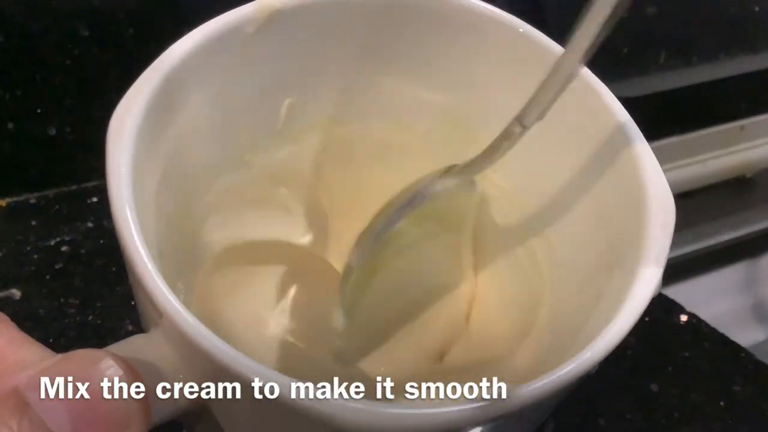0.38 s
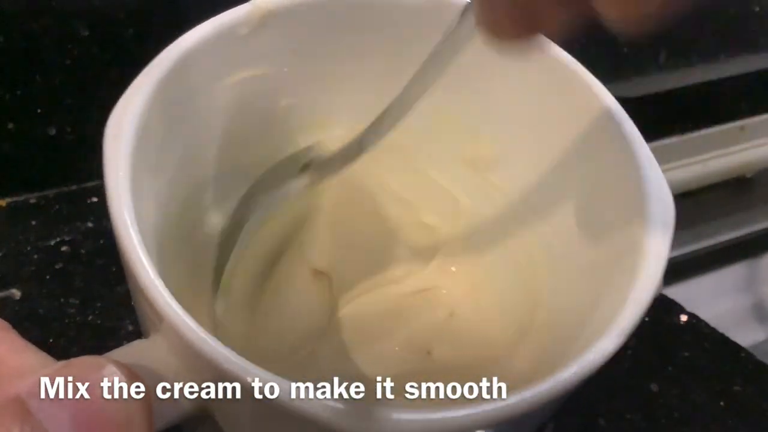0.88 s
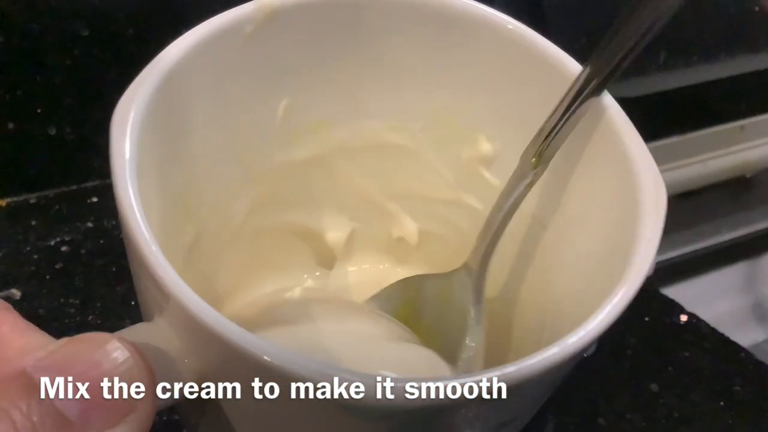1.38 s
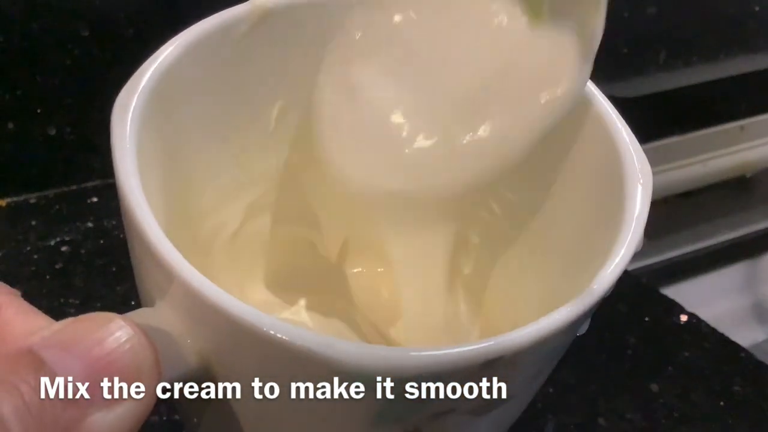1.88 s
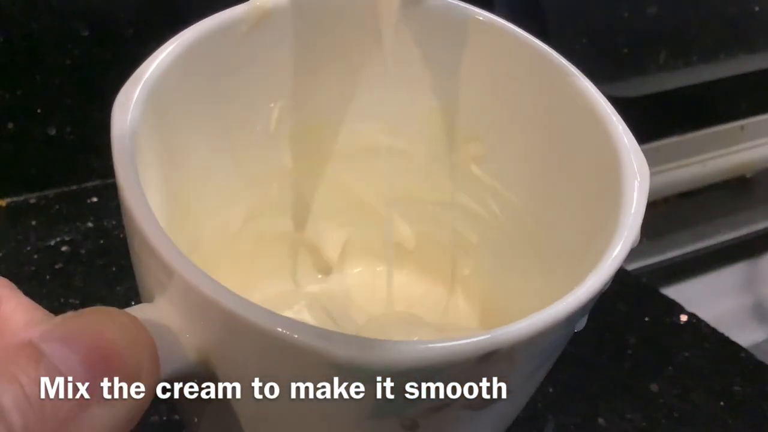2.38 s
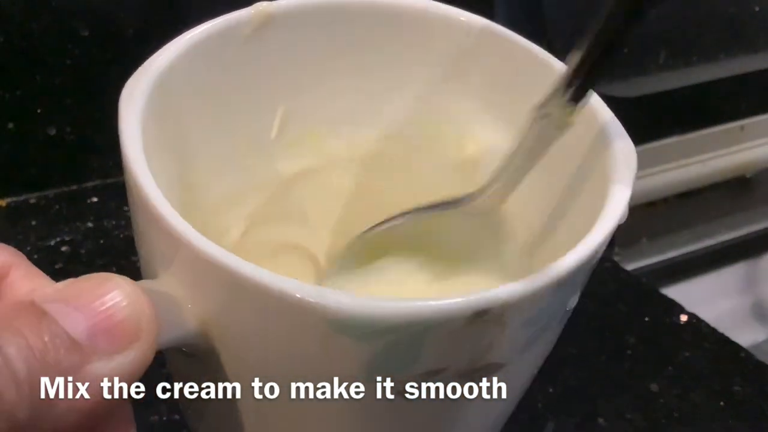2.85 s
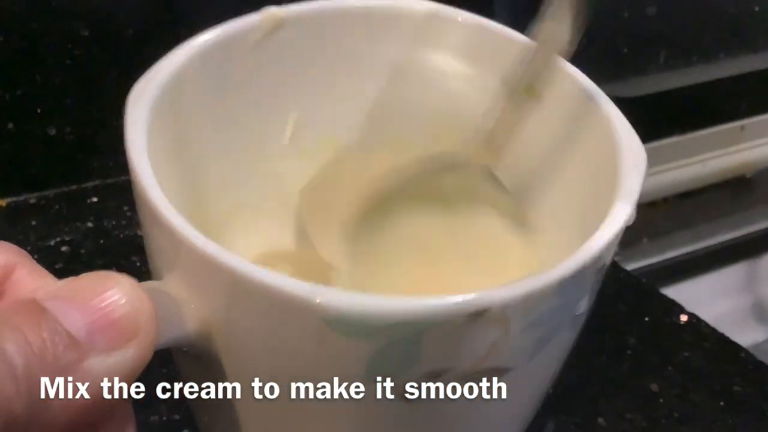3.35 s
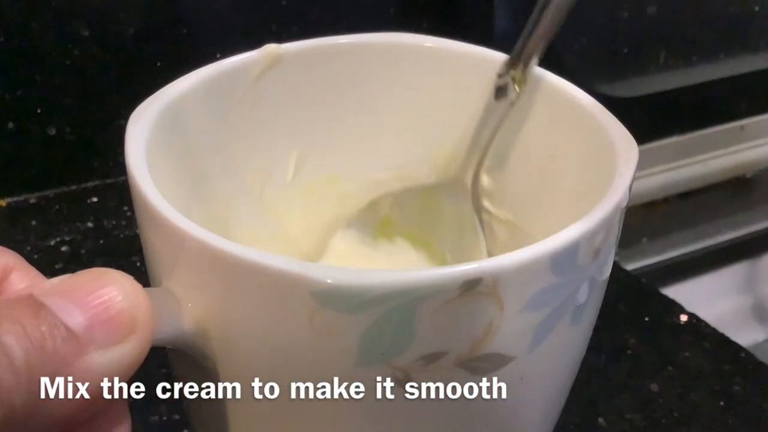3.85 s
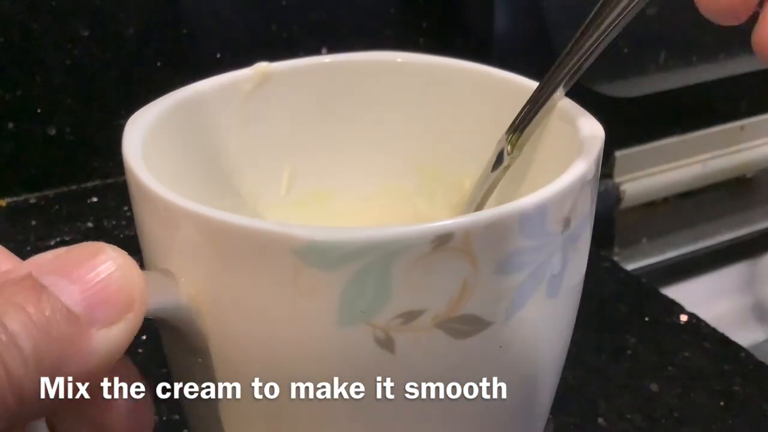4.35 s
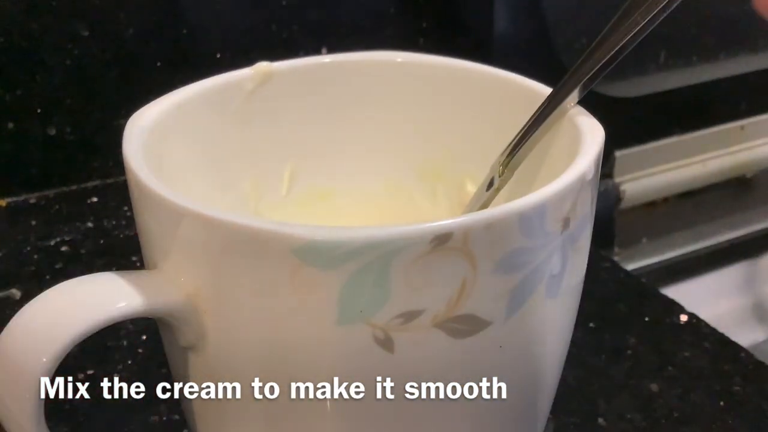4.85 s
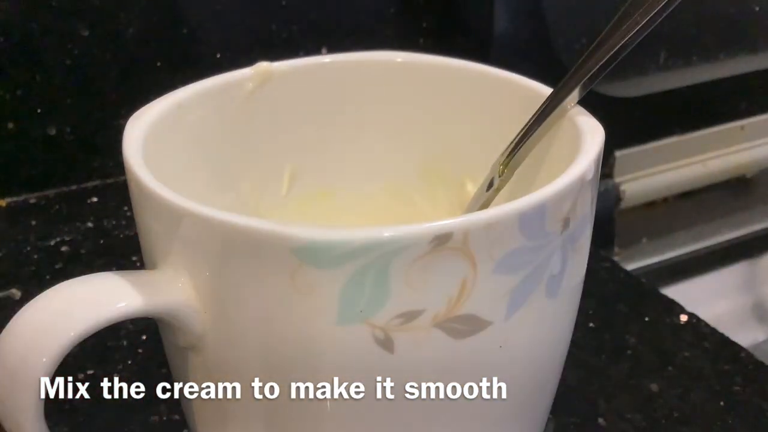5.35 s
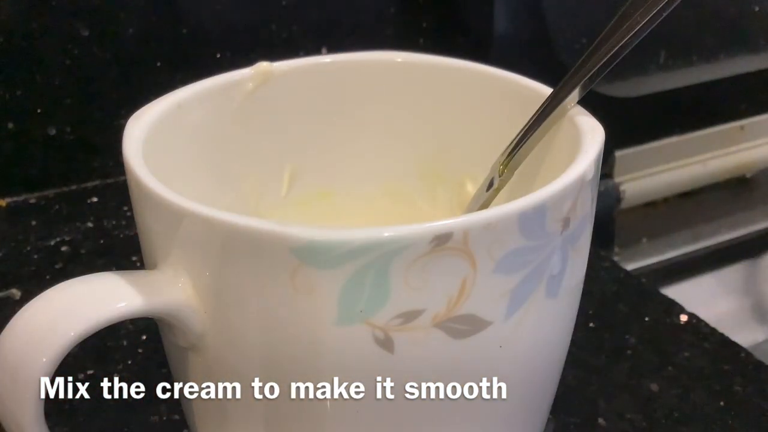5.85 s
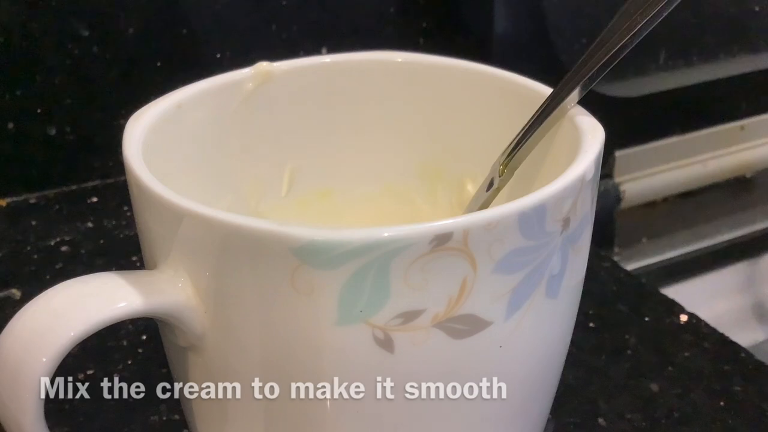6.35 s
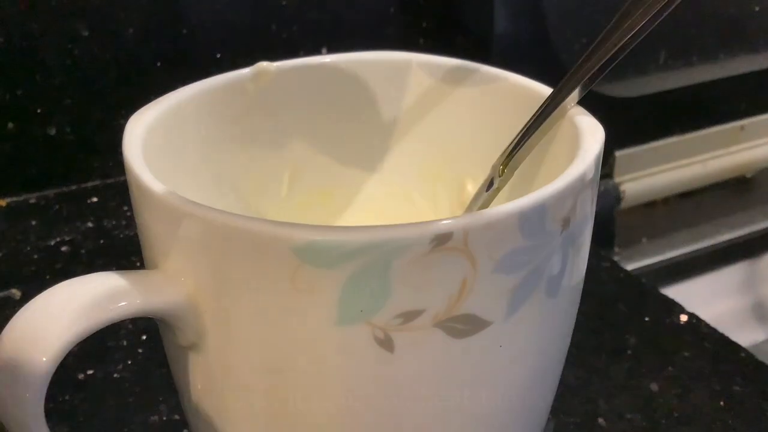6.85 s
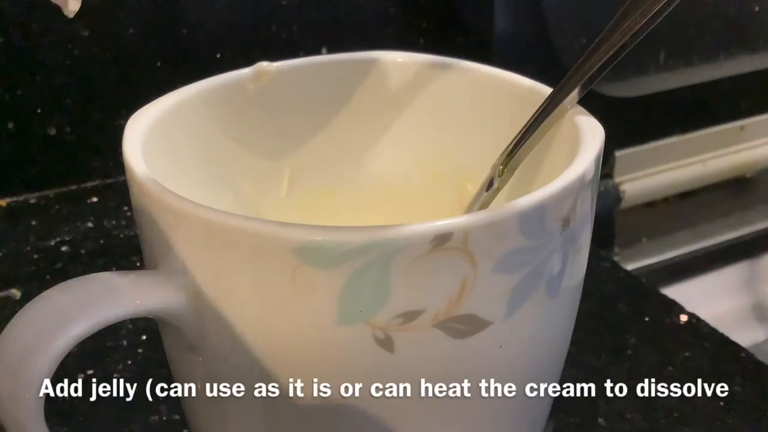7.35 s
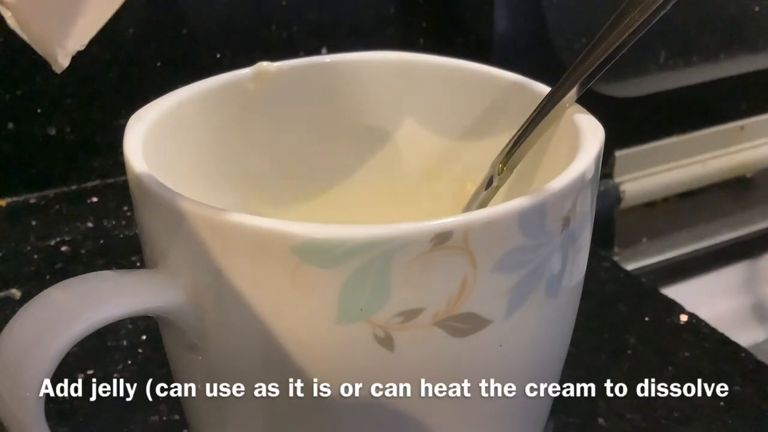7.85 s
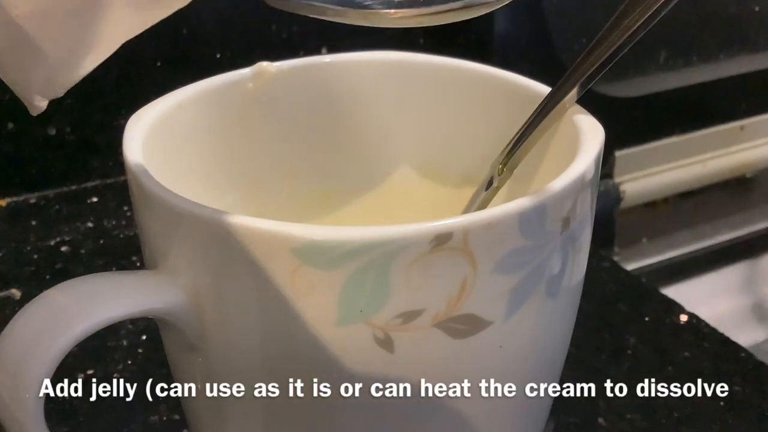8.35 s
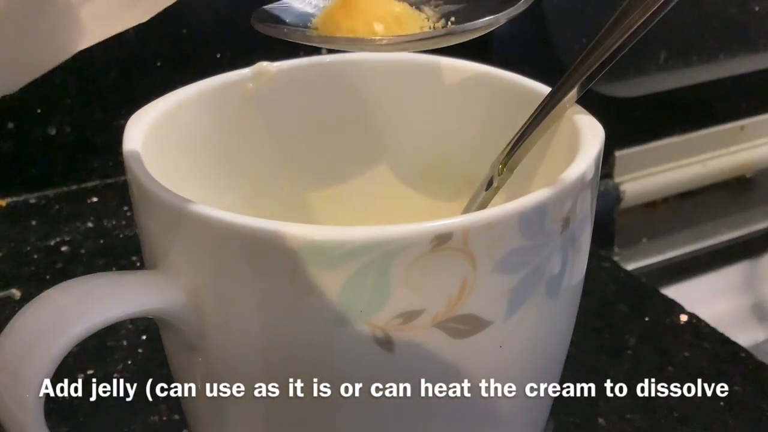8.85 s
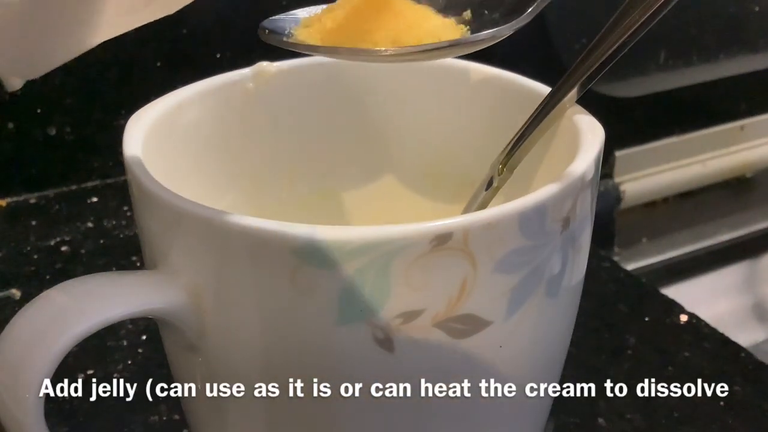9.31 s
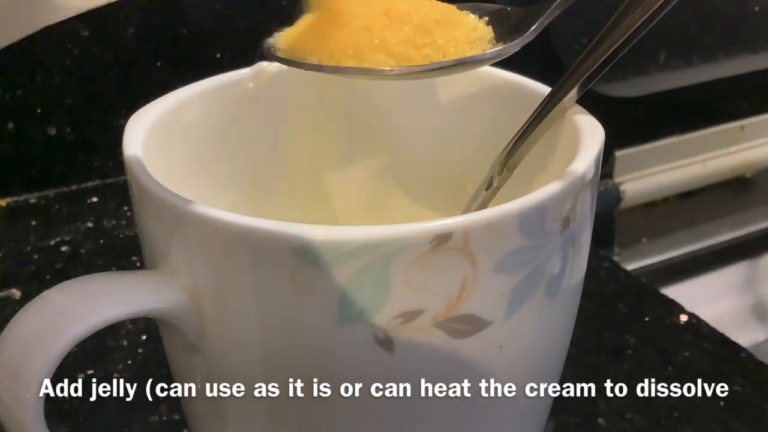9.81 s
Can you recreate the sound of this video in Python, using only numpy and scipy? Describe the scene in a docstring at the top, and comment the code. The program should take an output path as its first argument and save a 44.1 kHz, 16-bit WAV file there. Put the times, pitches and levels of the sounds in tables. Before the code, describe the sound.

Damped spoon clinks and short wet scrapes in a thick mug, clear bird whistles through a window, then faint packet rustle and distant traffic.

```python
"""Spoon in a mug, birds outside

A steel spoon knocks and scrapes in a thick ceramic mug half full of cream, with a few small ticks and late
taps nearby: damped modes and noise, kitchen echo. Through the window one bird whistles, another chirps harshly,
and high calls sound: gliding sines, yard echo. Later a paper packet rustles and powder hisses (shaped noise,
ticks), and distant traffic swells with a drone. Noise makes the room tone and a wavering hum; a faint soft
throb recurs about four times a second.
"""
import sys
import numpy as np
from scipy import signal
from scipy.fft import rfft, irfft
from scipy.io import wavfile
from scipy.ndimage import uniform_filter1d

SR = 44100
rng = np.random.default_rng(int(sys.argv[2]) if len(sys.argv) > 2 else 0)


def natural_amplitude(level_db):
    """Convert a level in decibels to a linear amplitude factor, elementwise."""
    exponent = np.asarray(level_db, float) / 20
    return 10 ** exponent


def inscribe(sig):
    """Save sig as 16-bit PCM at rate SR to the path in sys.argv[1].

    A 1-D sig is mono; a 2-D sig holds one channel per row.
    Samples are clipped to [-1, 1] before scaling.
    """
    pcm = np.round(np.clip(np.atleast_2d(sig).T, -1, 1) * 32767)
    wavfile.write(sys.argv[1], SR, pcm.astype(np.int16))


N = 438794
T = np.arange(N) / SR

# room tone spectrum: (frequency [Hz], relative density [dB per Hz])
ROOM_COLOUR = [(20, -15.5), (45, -7), (100, -7), (142, -7.5), (293, -11), (580, -14.5), (1000, -18),
               (1450, -26.5), (2900, -31.5), (5500, -38), (16000, -51)]
ROOM_DB = -65

# knocks on the mug, with a few small ticks and late taps nearby, all through the mug's modes:
# (time [s], strength [dB], height [0 base - 1 rim], bareness of steel [0 creamy - 1 clean])
STRIKES = [(0.049, -25, 0.78, 0.77), (0.095, -20, 0.52, 0.4), (0.31, -21.5, 0.92, 0.65),
           (0.343, -19.5, 0.5, 0.36), (0.703, -18.5, 0.47, 0.42), (0.978, -36, 0.41, 0.018),
           (1.048, -49, 0.072, 0.6), (1.08, -38.5, 0.41, 0.25), (1.147, -39, 0.77, 0.7),
           (1.18, -48, 0.08, 0.74), (1.221, -39, 0.5, 0.55), (1.267, -35.5, 0.57, 0.41),
           (1.353, -39, 0.52, 0.44), (1.399, -36.5, 0.47, 0.26), (1.441, -24, 0.63, 0.75),
           (1.789, -45, 0, 0.42), (2.381, -68, 0, 1), (2.733, -21.5, 0.46, 0.49), (2.803, -28, 0.91, 0.62),
           (2.986, -50, 0, 0.99), (3.004, -28.5, 0.6, 0.36), (3.019, -31.5, 0.49, 0.11),
           (3.077, -33, 0.67, 0.57), (3.103, -52, 0.93, 0.94), (3.175, -17, 0.71, 0.76),
           (3.227, -24.5, 0.36, 0.23), (3.287, -38, 0.65, 0.19), (3.329, -33.5, 0.54, 0.61),
           (3.398, -38, 0.055, 0.72), (3.494, -37.5, 0.41, 1), (3.533, -25, 0.61, 0.34),
           (3.552, -39, 0.79, 0.57), (3.743, -26, 0.55, 0.52), (3.913, -36, 0.6, 0.52),
           (4.063, -36.5, 0.11, 0.022), (4.085, -62, 0, 1), (4.17, -64, 0, 0.85), (4.24, -42, 0.5, 0.64),
           (4.371, -62, 0, 0.76), (4.457, -55.5, 0, 0.76), (6.897, -52, 0.53, 0.48),
           (6.999, -50, 0.41, 0.43), (7.241, -41.5, 0.36, 0.065), (7.733, -42, 0.28, 0.064),
           (8.608, -49, 0.54, 0.66)]
# mug and spoon modes, four families: (frequency [Hz], relative level [dB], t60 [s])
BASE_MODES = [(271, -24, 0.076), (478, -25, 0.011), (626, -6.5, 0.045), (765, -5, 0.025), (983, -3, 0.047),
              (1085, -1, 0.038)]
WALL_MODES = [(1540, -7, 0.031), (1870, -6, 0.035), (1960, -7.5, 0.063)]
UPPER_MODES = [(2220, -15.5, 0.018), (2486, -18, 0.062), (3100, -10, 0.039), (4270, -9.5, 0.015)]
SPOON_MODES = [(5600, -12, 0.022), (7740, -15.5, 0.022), (8900, -17, 0.025)]
# relative share of base, wall, upper, spoon families:
# (at height 0 and bareness 0 [dB], slope [dB per height], slope [dB per bareness])
FAMILY_SHARES = [(0, -3.5, 4.5), (-29.5, 50.5, 6), (-24, 20, 32), (-40.5, 4.5, 65.5)]
MODE_SCATTER_DB, CHATTER_S, DETUNE_RATIO = 5, 0.0012, 0.025  # largest deviation per mode
BODY_BELOW_HZ, BODY_DB_PER_HEIGHT = 800, 18  # deep modes wake only when the blow lands well up the wall
THUD_DB, THUD_T60_S = -23.5, 0.007
CRACK_DB, CRACK_T60_S = -11.5, 0.039
# hard low blows jolt the mug on the counter; growth in dB per dB of base level, up to the knee
JOLT_DB, JOLT_T60_S, JOLT_KNEE_DB, JOLT_GROWTH = -8, 0.1, -25.5, 7.5

# spoon strokes along the glaze: (start [s], length [s], level [dB], brightness of bare steel on glaze [dB])
STROKES = [(0.06, 0.098, -57, -3.5), (0.315, 0.055, -70.5, 7), (1.036, 0.098, -48.5, -23),
           (1.111, 0.098, -48.5, -11.5), (1.181, 0.18, -53.5, -10), (1.388, 0.042, -54.5, -13),
           (1.455, 0.085, -65.5, -0.5), (3.037, 0.0093, -53.5, -18), (3.072, 0.04, -54.5, -9),
           (3.177, 0.15, -72, -17), (3.327, 0.063, -44, -19.5), (3.384, 0.073, -59, -8.5),
           (3.484, 0.047, -78, 4), (3.547, 0.09, -52, -15), (3.928, 0.031, -48, -18)]
FLURRY_DB = 6.5  # unevenness of scraping
SLIDE_SHARE, CRACKLE_SHARE = 0.5, 1.1  # smooth sliding and wet crackle beside the ticks
KITCHEN_T60_S, KITCHEN_DB = 0.44, -10.5

# whistled arcs: (start [s], length [s], first [Hz], middle [Hz], last [Hz], mean level [dB rms])
WHISTLE_NOTES = [(0.105, 0.15, 1915, 1897, 2038, -48), (0.323, 0.098, 1976, 1957, 1932, -40.5),
                 (0.721, 0.067, 2650, 2797, 3000, -47), (0.782, 0.086, 3060, 3010, 2985, -44),
                 (1.241, 0.15, 2560, 2226, 2027, -55), (1.247, 0.13, 4290, 3720, 3480, -60.5),
                 (4.137, 0.115, 2730, 2636, 2200, -66), (4.441, 0.2, 2380, 2515, 2110, -66.5),
                 (4.725, 0.09, 2964, 3040, 2640, -69.5), (4.845, 0.057, 2840, 3270, 3520, -71),
                 (4.905, 0.023, 2200, 2120, 2030, -67), (4.997, 0.064, 2270, 2057, 1910, -53.5),
                 (5.274, .15, 2350, 2065, 1712, -48), (5.73, 0.031, 2050, 2153, 2093, -46.5),
                 (5.983, 0.15, 1830, 2607, 1690, -51), (6.228, 0.064, 1717, 1963, 1667, -42.5),
                 (6.416, 0.15, 2395, 2288, 2134, -50), (6.568, 0.056, 2180, 2570, 3020, -48),
                 (6.742, 0.26, 3123, 2927, 2692, -50.5), (9.104, 0.22, 1900, 2390, 2340, -71.5)]
NOTE_SWELL_DB, STEEP_HZ_PER_S = 10, 7900  # full swell at or above this glide
NOTE_EDGE_S, ARC_FLATNESS = 0.0031, 1.9
OCTAVE_DB, OCTAVE_FROM_HZ = -30, 2700
# warbled notes: (start [s], length [s], first [Hz], last [Hz], warble depth [Hz], peak level [dB])
WARBLE_NOTES = [(.52, 0.15, 2340, 1960, 301, -50), (5.615, 0.114, 1960, 2047, 134, -46)]
WARBLE_PER_S, WARBLE_ROUGHNESS = 28, 0.2
# harsh chirps: (start [s], length [s], first [Hz], peak level [dB])
CHIRP_CALLS = [(.86, 0.06, 4620, -67.5), (1.625, 0.083, 4880, -65), (2.505, 0.084, 4860, -71),
               (4.203, 0.076, 4550, -69.5), (4.94, 0.087, 4630, -67.5), (5.63, 0.11, 4070, -64.5),
               (6.385, 0.051, 4640, -66), (6.99, 0.085, 4710, -66), (7.72, .11, 4334, -68),
               (8.42, 0.054, 4570, -71), (9.19, 0.077, 4540, -64)]
CHIRP_SAG_HZ_PER_S, CHIRP_SHAKE_DEPTH_HZ = 16000, 422.5
# short high calls: (start [s], length [s], first [Hz], peak level [dB])
HIGH_CALLS = [(1.72, 0.084, 7170, -70.5), (2.055, 0.13, 7310, -76), (7.06, 0.065, 8430, -79),
              (7.19, 0.014, 6720, -69.5), (9.43, 0.026, 6820, -81)]
HIGH_SAG_HZ_PER_S, HIGH_SHAKE_DEPTH_HZ = 7800, 239
CALL_PEAK_SKEW, CALL_SOFTNESS, CALL_OCTAVE_DB = 0.66, 0.37, -29.5  # envelope and overtone
YARD_T60_S, WHISTLE_ECHO_DB, FAR_ECHO_DB = 0.63, -1, 10

THROB_FIRST_S, THROB_PERIOD_S = 0.159, 0.256
THROB_WIDTH_S, THROB_DB = 0.011, -51.5

# powder hiss: (time [s], level [dB])
HISS_LEVEL = [(5.4, -104), (5.75, -80.5), (6.4, -77), (6.68, -86.5), (6.82, -72), (7.0, -99.5),
              (8.3, -84.5), (8.42, -68.5), (9.3, -72), (9.6, -68.5), (9.95, -75.5)]
# powder hiss spectrum: (frequency [Hz], relative density [dB per Hz])
HISS_COLOUR = [(1470, -34), (2500, -14), (3260, -2.5), (6400, -6.5), (11200, -6), (16000, -10)]
HISS_FLICKER_DB = 2
PACKET_START_S, PACKET_END_S, PACKET_TICKS_PER_S = 7.0, 8.32, 45
# small dry ticks close by: (time [s], level [dB])
DRY_TICKS = [(8.183, -61), (8.255, -73), (8.61, -50), (9.539, -52)]

# distant traffic: (time [s], rumble level [dB], drone pitch [Hz], drone level [dB])
TRAFFIC_SWELL = [(6.3, -73.5, 271, -77), (7.4, -71.5, 281, -74), (8.4, -69.5, 301.4, -69.5),
                 (9.1, -65, 301, -73), (9.95, -73.5, 300, -80)]


def curve(rows, column, outside=-120.0):
    """One table column, linear in time."""
    rows = np.array(rows, float)
    return np.interp(T, rows[:, 0], rows[:, column], outside, outside)


def level(x):
    """Scale to rms 1."""
    return x / np.sqrt(np.mean(x ** 2))


def band(x, lo_hz, hi_hz):
    """Band-pass."""
    return signal.sosfilt(signal.butter(2, [lo_hz, hi_hz], "band", fs=SR, output="sos"), x)


def coloured(points):
    """Noise of rms 1 with the given spectrum."""
    hz, db = np.transpose(points)
    bin_hz = np.maximum(np.fft.rfftfreq(N, 1 / SR), 1)
    gain = natural_amplitude(np.interp(np.log(bin_hz), np.log(hz), db))
    return level(irfft(rfft(rng.standard_normal(N)) * gain, N))


def walk(rate_hz):
    """Random levels held 1 / rate_hz and slewed twice; spread near 1."""
    hold = int(SR / rate_hz)
    steps = np.repeat(rng.standard_normal(N // hold + 1), hold)
    return 1.3 * uniform_filter1d(uniform_filter1d(steps, hold), hold)[:N]


def echo(x, t60_s, rise_s):
    """Diffuse echo: unit-energy noise tail that builds up and dies away."""
    t = T[:SR]
    envelope = np.exp(-np.log(1000) * t / t60_s) * (1 - np.exp(-t / rise_s))
    tail = rng.standard_normal(SR) * envelope
    return signal.fftconvolve(x, tail / np.sqrt(np.sum(tail ** 2)))[:N]


def ring(push, hz, t60_s):
    """One damped mode driven by a force signal."""
    radius = np.exp(-np.log(1000) / (t60_s * SR))
    w = 2 * np.pi * hz / SR
    return signal.lfilter([0, np.sin(w)], [1, -2 * radius * np.cos(w), radius ** 2], push)


def burst(at, db, t60_s, lo_hz, hi_hz):
    """Short dying puffs of noise at the given samples."""
    kick = np.zeros(N)
    kick[at] = natural_amplitude(db)
    fade = signal.lfilter([1], [1, -np.exp(-np.log(1000) / (t60_s * SR))], kick)
    return fade * level(band(rng.standard_normal(N), lo_hz, hi_hz))


def room_tone():
    """Steady coloured noise."""
    return natural_amplitude(ROOM_DB + 0.36 * walk(1.81)) * coloured(ROOM_COLOUR)


def hum():
    """Narrow noise near 100 Hz, wavering in level."""
    return natural_amplitude(-68.0 + 2.6 * walk(22)) * level(band(rng.standard_normal(N), 72.7, 107.0))


def struck_modes(at, family_levels_db, height):
    """Each blow lands on another spot and chatters, so every mode gets its own share, start and tuning."""
    out, t = np.zeros(N), T[:SR // 5]
    for levels_db, modes in zip(family_levels_db, [BASE_MODES, WALL_MODES, UPPER_MODES, SPOON_MODES]):
        hz, db, t60_s = np.transpose(modes)[:, :, None]
        family = np.zeros(N)
        chances = rng.random((len(at), 3, len(modes), 1))
        for i, blow_db, up, chance in zip(at, levels_db, height, chances):
            share, late, tune = 2 * chance - 1
            since = np.maximum(t - np.abs(late) * CHATTER_S, 0)
            # spoon and cream load the wall a little differently every time
            tone = np.sin(2 * np.pi * hz * (1 + DETUNE_RATIO * tune) * since)
            waves = tone * np.exp(-np.log(1000) * since / t60_s)
            body_db = BODY_DB_PER_HEIGHT * (up - 0.5) * (hz < BODY_BELOW_HZ)
            size = natural_amplitude(db + MODE_SCATTER_DB * share + body_db)
            # the spot changes the colour, not the energy
            size = size * np.sqrt(np.sum(natural_amplitude(2 * db)) / np.sum(size ** 2))
            family[i:i + len(t)] += np.sum(natural_amplitude(blow_db) * size * waves, axis=0)
        # contact through cream is soft: little energy lands far from the modes
        edges_hz = modes[0][0] * 0.7, modes[-1][0] * 1.81
        out += band(band(family, *edges_hz), *edges_hz)
    return out


def contact_noise(at, family_levels_db):
    """Noise puffs per blow: dull thud, jolt on the counter, clack and bright crack."""
    base_db, _, upper_db, spoon_db = family_levels_db
    thud = burst(at, base_db + THUD_DB, THUD_T60_S, 340, 2600)
    jolt_db = JOLT_DB + base_db + JOLT_GROWTH * np.minimum(base_db - JOLT_KNEE_DB, 0)
    jolt = band(burst(at, jolt_db, JOLT_T60_S, 253, 980), 200, 690)
    clack = burst(at, upper_db + CRACK_DB, CRACK_T60_S, 1720, 4460)
    crack = burst(at, spoon_db + CRACK_DB, CRACK_T60_S, 2900, 11100)
    return thud + jolt + clack + crack


def blows():
    """Knocks on the mug, a few ticks and late taps nearby: height rings the wall, clean steel the upper modes."""
    start_s, strength_db, height, bare = np.transpose(STRIKES)
    at = (start_s * SR).astype(int)
    shares_db = np.array(FAMILY_SHARES) @ np.array([np.ones_like(height), height, bare])
    # the shares add up to the strength
    family_levels_db = strength_db + shares_db - 10 * np.log10(np.sum(natural_amplitude(2 * shares_db), axis=0))
    return struck_modes(at, family_levels_db, height) + contact_noise(at, family_levels_db)


def scrape():
    """Uneven stick-slip ticks in flurries ring the mug, crackle in the cream and hiss on the glaze."""
    ticks = (rng.random(N) < 900 / SR) * rng.standard_normal(N) * natural_amplitude(1.1 * rng.exponential(1, N))
    ticks = level(ticks) + SLIDE_SHARE * rng.standard_normal(N)
    ticks = ticks * natural_amplitude(FLURRY_DB * walk(50))

    base_ring = sum(natural_amplitude(db) * ring(ticks, hz, t60_s) for hz, db, t60_s in BASE_MODES[1:])
    low = level(band(base_ring, 470, 1610))
    # upper decays are halved here
    mid = level(sum(natural_amplitude(db) * ring(ticks, hz, t60_s / 2) for hz, db, t60_s in WALL_MODES + UPPER_MODES))
    # the dragged edge squeaks in a narrow band that wanders with the pressure
    squeak_phase = 2 * np.pi * np.cumsum(4000 + 350 * walk(8)) / SR
    squeak = level(band(ticks, 30, 500) * np.sin(squeak_phase))

    pops = (rng.random(N) < 150 / SR) * rng.standard_normal(N)
    crackle = signal.lfilter([1], [1, -0.985], np.abs(pops)) * rng.standard_normal(N)
    steel = level(sum(ring(ticks, hz, t60_s / 2) for hz, _, t60_s in SPOON_MODES))
    glaze_hiss = rng.standard_normal(N) + ticks + CRACKLE_SHARE * level(crackle) + natural_amplitude(-2) * steel
    bright = level(band(glaze_hiss, 3500, 12000))

    gains = np.zeros((3, N))
    for start_s, length_s, db, bright_db in STROKES:
        stroke = slice(int(start_s * SR), int((start_s + length_s) * SR))
        gains[:, stroke] = natural_amplitude(db + bright_db * np.array([[0], [0.5], [1]]))
    low_gain, mid_gain, bright_gain = uniform_filter1d(gains, size=600)
    return low_gain * low + mid_gain * (natural_amplitude(4) * mid + natural_amplitude(-2) * squeak) + bright_gain * bright


def whistles():
    """Near-pure arcs through three pitches; steep glides swell, high pitches carry a faint octave."""
    out = np.zeros(N)
    for start_s, length_s, first_hz, middle_hz, last_hz, db in WHISTLE_NOTES:
        i = slice(int(start_s * SR), int((start_s + length_s) * SR))
        u = (T[i] - start_s) / length_s
        bend_hz = middle_hz - (first_hz + last_hz) / 2
        hz = first_hz + (last_hz - first_hz) * u + bend_hz * (1 - np.abs(2 * u - 1) ** ARC_FLATNESS)
        phase = 2 * np.pi * np.cumsum(hz) / SR
        tone = np.sin(phase) + natural_amplitude(OCTAVE_DB) * (hz > OCTAVE_FROM_HZ) * np.sin(2 * phase)
        glide_hz_per_s = abs(last_hz - first_hz) / length_s
        swell_db = NOTE_SWELL_DB * min(glide_hz_per_s / STEEP_HZ_PER_S, 1)
        edges = np.clip(np.minimum(u, 1 - u) * length_s / NOTE_EDGE_S, 0, 1)
        out[i] += natural_amplitude(db + swell_db * (u - 0.5)) * edges * tone
    # moving air between yard and window makes the level flutter
    return np.sqrt(2) * natural_amplitude(2.2 * walk(70)) * out


def calls(rows, shakes_per_s, roughness):
    """Glides with shaken pitch; rough throats shake unevenly."""
    out, tremor = np.zeros(N), walk(300)
    for start_s, length_s, first_hz, last_hz, depth_hz, db in rows:
        i = slice(int(start_s * SR), int((start_s + length_s) * SR))
        u = (T[i] - start_s) / length_s
        shake = np.sin(2 * np.pi * shakes_per_s * length_s * u) + roughness * tremor[i]
        hz = first_hz + (last_hz - first_hz) * u + depth_hz * shake
        phase = 2 * np.pi * np.cumsum(hz) / SR
        tone = np.sin(phase) + natural_amplitude(CALL_OCTAVE_DB) * np.sin(2 * phase)
        envelope = np.abs(np.sin(np.pi * np.clip(u, 0, 1) ** CALL_PEAK_SKEW)) ** CALL_SOFTNESS
        out[i] += natural_amplitude(db) * envelope * tone
    return out


def sagging(rows, sag_hz_per_s, depth_hz):
    """Full rows for calls that slide down at a shared rate."""
    return [(start_s, length_s, hz, hz - sag_hz_per_s * length_s, depth_hz, db)
            for start_s, length_s, hz, db in rows]


def birds():
    """Whistler near; chirps and high calls far, heard mostly by yard echo."""
    near = whistles() + calls(WARBLE_NOTES, WARBLE_PER_S, WARBLE_ROUGHNESS)
    chirps = calls(sagging(CHIRP_CALLS, CHIRP_SAG_HZ_PER_S, CHIRP_SHAKE_DEPTH_HZ), 71, 0.97)
    high = calls(sagging(HIGH_CALLS, HIGH_SAG_HZ_PER_S, HIGH_SHAKE_DEPTH_HZ), 89, 0.42)
    far = chirps + high
    to_yard = natural_amplitude(WHISTLE_ECHO_DB) * near + natural_amplitude(FAR_ECHO_DB) * far
    return near + far + echo(to_yard, YARD_T60_S, rise_s=0.00037)


def throb():
    """Soft symmetric Gaussian bump at a strict period, mean removed."""
    lag_s = (T - THROB_FIRST_S + THROB_PERIOD_S / 2) % THROB_PERIOD_S - THROB_PERIOD_S / 2
    bump = np.exp(-0.5 * (lag_s / THROB_WIDTH_S) ** 2)
    return natural_amplitude(THROB_DB) * (bump - bump.mean())


def rustle():
    """Fine powder hiss; paper ticks lift it while the packet is handled; dry ticks close by."""
    handled = (T > PACKET_START_S) & (T < PACKET_END_S)
    ticks = handled * (rng.random(N) < PACKET_TICKS_PER_S / SR) * natural_amplitude(25.7 * rng.random(N))
    ticks = signal.lfilter([1], [1, -0.99], ticks)
    hiss = natural_amplitude(curve(HISS_LEVEL, 1) + HISS_FLICKER_DB * walk(8.8)) * coloured(HISS_COLOUR)
    start_s, tick_db = np.transpose(DRY_TICKS)
    dry_ticks = burst((start_s * SR).astype(int), tick_db, 0.0099, 1550, 3900)
    return hiss * (1 + ticks) + dry_ticks


def traffic():
    """Distant rumble swelling late, with a low drone of wandering pitch."""
    rumble = natural_amplitude(curve(TRAFFIC_SWELL, 1)) * level(band(rng.standard_normal(N), 140, 1000))
    drone_hz = curve(TRAFFIC_SWELL, 2, outside=500.0) + 4 * walk(6.4)
    drone_gain = natural_amplitude(curve(TRAFFIC_SWELL, 3) + 3 * walk(12))
    return rumble + drone_gain * np.sin(2 * np.pi * np.cumsum(drone_hz) / SR)


def scene():
    """Mug with kitchen echo, birds, packet, throb and background; one channel."""
    mug = blows() + scrape()
    dulled = signal.lfilter([0.5], [1, -0.55], mug)  # the echo is duller than the direct sound
    mug = mug + natural_amplitude(KITCHEN_DB) * echo(dulled, KITCHEN_T60_S, rise_s=0.002)
    background = room_tone() + hum() + traffic()
    return (mug + birds() + rustle() + background + throb())[None]


def band_limit(x):
    """A steep low-pass at the top of the band."""
    return signal.sosfilt(signal.butter(12, 15950, fs=SR, output="sos"), x)


def record(dry):
    """Finished mix to output."""
    return band_limit(dry)


dry = scene()
out = record(dry)
inscribe(out)
```